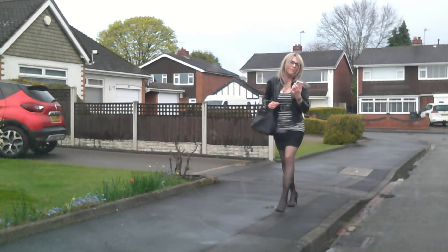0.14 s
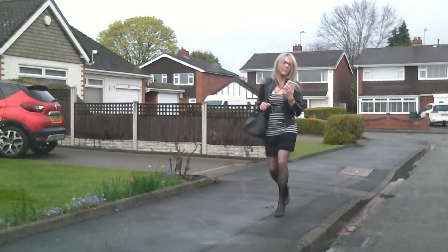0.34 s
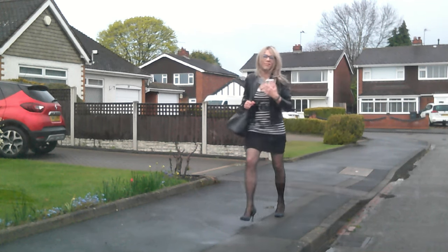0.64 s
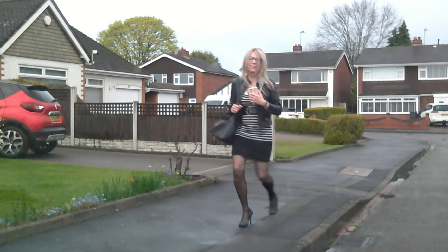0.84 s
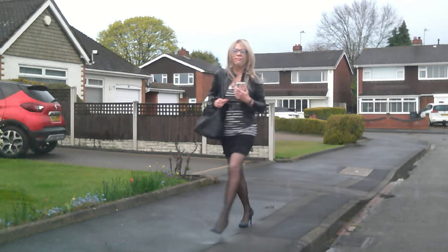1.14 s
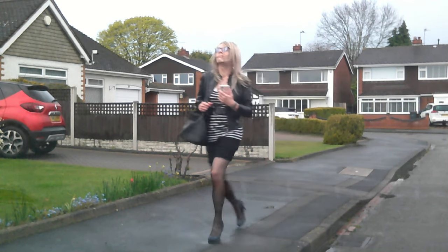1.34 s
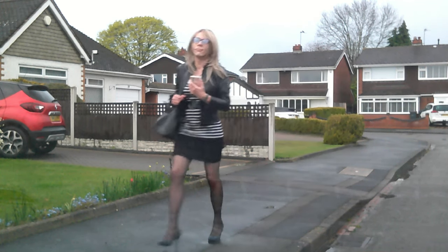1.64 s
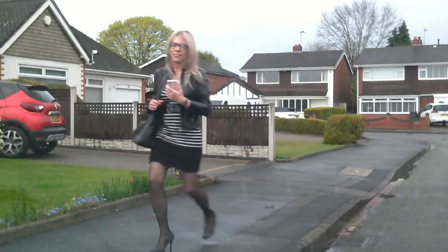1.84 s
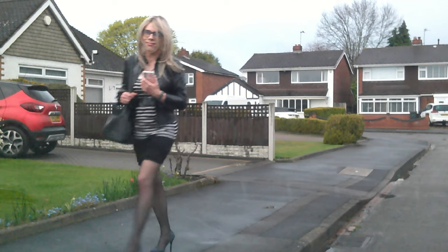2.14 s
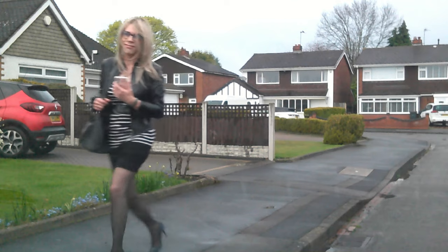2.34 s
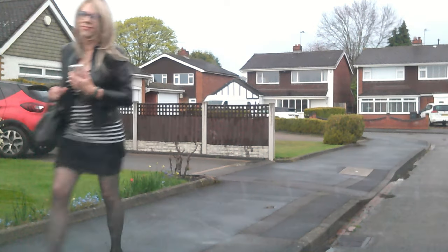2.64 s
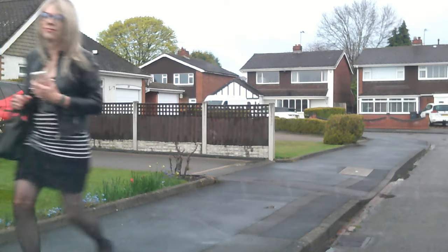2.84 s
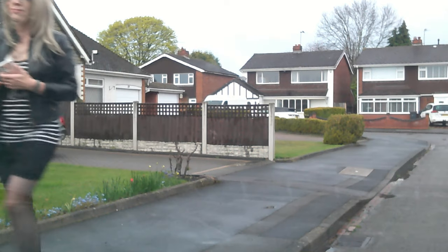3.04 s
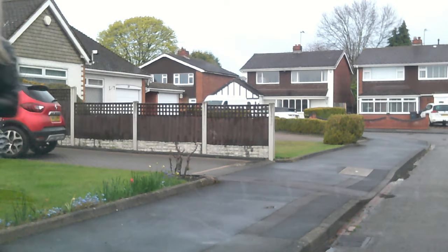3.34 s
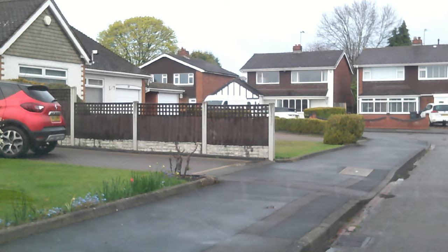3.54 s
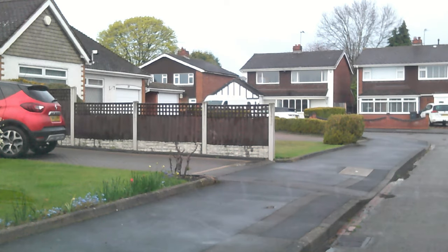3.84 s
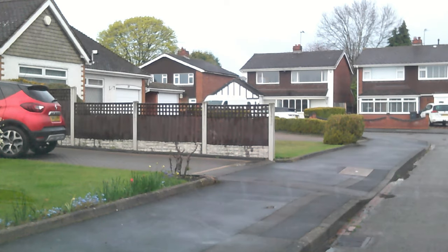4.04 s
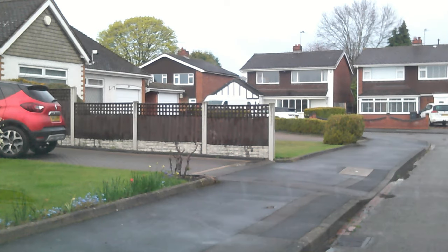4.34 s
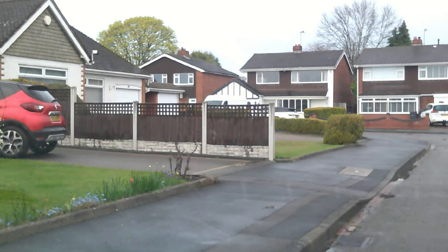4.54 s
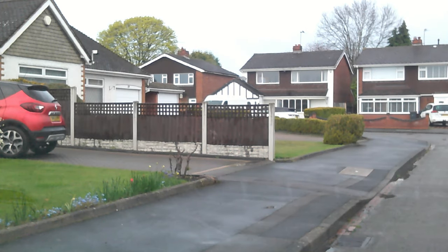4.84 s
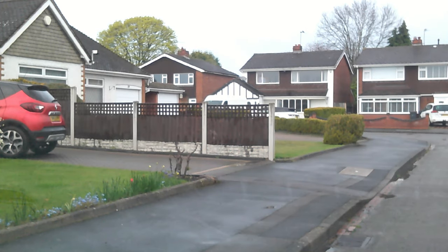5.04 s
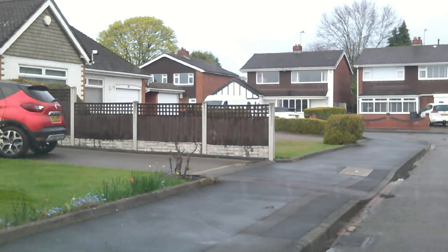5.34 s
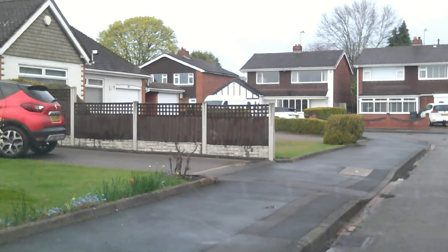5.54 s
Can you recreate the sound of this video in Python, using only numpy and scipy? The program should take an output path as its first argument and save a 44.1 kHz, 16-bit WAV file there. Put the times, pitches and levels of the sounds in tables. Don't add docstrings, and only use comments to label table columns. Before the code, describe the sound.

From inside a parked car on a quiet residential street, a woman's heels knock dully on wet pavement, roughly two steps a second, with small sole scuffs. She passes, and the strongest steps come from behind near the end. Low wind rumbles on the body of the car, distant traffic and a motor hum sit underneath, a bird peeps faintly, and the small camera's microphone adds hiss and regular buzzes.

```python
import sys
import numpy as np
from scipy import signal
from scipy.fft import rfft, irfft
from scipy.io import wavfile
from scipy.ndimage import uniform_filter1d, map_coordinates

SR = 44100
rng = np.random.default_rng(int(sys.argv[2]) if len(sys.argv) > 2 else 0)


def dump_mix(stems):
    frames = np.atleast_2d(stems).T
    limited = np.clip(frames, -1, 1)
    pcm = np.round(limited * 32767).astype(np.int16)
    wavfile.write(sys.argv[1], SR, pcm)


def amplitude_ratio(level_db):
    exponent = np.asarray(level_db, float) / 20
    return 10 ** exponent


N = 250929
T = np.arange(N) / SR

# start_s, level_db, hardness_db, hollowness_db
HEELS = [(.187, -60.5, 0.5, 2), (.673, -61, -1.5, -2), (.978, -62.5, -8, 8), (1.209, -57.5, -2.5, -7),
         (1.688, -53.5, 1, -1), (2.225, -62.5, 7.5, 0), (2.694, -65, 7, -1.5), (3.221, -64, 2.5, 7.5),
         (3.525, -62, -3, 0), (3.684, -50, -2.5, -8), (4.181, -71.5, -0.5, 8.5)]
# start_s, level_db, hardness_db, hollowness_db
SOLES = [(.231, -71, 2.5, 0.5), (.69, -63.5, 2, 2), (.71, -62, 1.5, 4), (.738, -68.5, 0, 1),
         (.834, -76.5, -2.5, 10.5), (.988, -70.5, -7, 9.5), (1.223, -61, -6, -11), (1.707, -58.5, -4, 2.5),
         (1.759, -67.5, -6.5, 5), (1.808, -70, -1, -2), (1.87, -71.5, -5, 0), (2.211, -69.5, -3, -9),
         (2.244, -67.5, 6, 1), (2.279, -73.5, 5, -4), (2.711, -61, 7.5, -13), (2.74, -65, -3.5, 7.5),
         (3.24, -60, -1, 1), (3.718, -67.5, -2.5, 3), (3.754, -63.5, 1, -18), (4.213, -62.5, -3.5, 2)]
# start_s, level_db, hardness_db, hollowness_db
BEHIND = [
    (4.678, -73, 3, 7),
    (4.785, -61.5, -5, -8),
    (4.709, -48.5, 3, -15),
    (4.730, -67, -3, 1),
    (4.699, -43.5, 0, -14.5),
    (5.208, -62, -7, 10),
    (5.216, -46.5, -15, -8),
    (5.231, -47.5, -3.5, -2),
    (5.275, -66, -16, -5),
]
# pitch_hz, t60_s, lag_s
SHELL_AHEAD = [(720.6, 0.018, 0.002), (623, 0.01, 0.0032), (453.5, 0.042, 0.0047), (346, 0.03, .004),
               (200, 0.039, .003)]
SHELL_BEHIND = [(754, 0.01, 0.00082), (567, 0.0069, 0.0011), (437, 0.0055, 0.0016), (288, 0.017, 0.002),
                (207, 0.0069, 0.0032)]
READY_AHEAD = (0.62, -0.36, -1, 2.7, -0.23)
READY_BEHIND = (-1.2, -0.85, 0.77, 2, -3.1)
# start_s, level_db, centre_hz, width_hz
CRACKS = [(0.189, -68, 940, 200), (0.673, -68.5, 990, 300), (1.692, -77, 1000, 400), (2.695, -63, 964, 300),
          (2.744, -70.5, 2640, 1500), (2.23, -72, 970, 300), (3.69, -60, 946, 250),
          (3.718, -73, 2700, 1200), (4.206, -75, 1470, 1600), (4.73, -62.5, 1060, 300),
          (5.213, -63.5, 1020, 500), (5.219, -62, 2110, 604), (5.219, -67, 1660, 500),
          (5.22, -71, 3000, 1410), (5.239, -68, 1300, 700)]

# start_s (of the peak), length_s, level_db
BUFFETS = [(.13, 0.3, -48.5), (.42, .11, -33.5), (.58, 0.31, -46.5), (.99, 0.22, -50), (1.13, 0.091, -47),
           (1.32, 0.046, -50), (1.55, 0.3, -48), (1.83, 0.35, -54), (2.25, 0.15, -45), (2.48, 0.18, -44.5),
           (2.74, 0.38, -45), (3.11, 0.096, -43.5), (3.32, 0.6, -51.5), (3.63, 0.33, -45.5),
           (3.86, .08, -47.5), (4.07, 0.23, -42), (4.22, 0.11, -43.5), (4.39, 0.081, -47.5),
           (4.57, 0.19, -41.5), (4.74, 0.088, -42.5), (4.86, 0.037, -48), (5.04, 0.075, -41.5),
           (5.2, 0.28, -51.5), (5.53, 0.19, -43)]
# start_s (of the peak), length_s, level_db
GUSTS = [(.15, .3, -61), (.36, .2, -55), (.7, 0.26, -56), (.97, 0.3, -50), (1.2, 0.2, -46),
         (1.55, 0.38, -50.5), (1.71, .12, -47.5), (1.92, .2, -50), (2.14, 0.24, -47), (2.4, 0.53, -49),
         (2.82, 0.33, -48), (3.04, .16, -48.5), (3.4, .2, -48.5), (3.63, 0.39, -43.5), (3.94, .18, -50),
         (4.12, 0.13, -44.5), (4.3, 0.43, -47), (4.68, 0.27, -49), (4.94, 0.17, -53.5), (5.33, 0.43, -50.5),
         (5.68, 0.26, -55)]
# start_s (of the peak), length_s, level_db
PUFFS = [(.01, 0.27, -54.5), (.73, 0.24, -54.5), (.95, .2, -60.5), (1.66, .07, -54), (1.79, 0.088, -54),
         (1.97, 0.42, -54.5), (2.3, 0.67, -59), (2.8, 0.25, -57), (3.13, 0.11, -60), (3.23, .06, -60),
         (3.37, 0.23, -54), (3.95, 0.15, -54), (4.32, 0.11, -49.5), (4.49, .16, -57.5), (4.86, .14, -52),
         (5.08, 0.088, -43), (5.23, 0.41, -56), (5.6, 0.1, -47.5)]
LULL_DB = (-60.5, -63.5, -71)

# pitch_hz, level_db
BUZZ_TONES = [(2261, -85), (2760, -87), (3468, -87.5), (3618, -102), (4522, -104), (6770, -98.5),
              (6934, -100.5), (7251, -87.5), (7402, -89.5)]
# pitch_hz, level_db (per Hz)
BUZZ_FIZZ = [(2000, -33), (2800, -5), (4000, -17), (5200, -31.5), (6100, -11.5), (6800, -2), (7100, -4.5),
             (7600, -5), (8000, -18), (8500, -35)]
# tick_number, lag_s, length_s, level_db
ODD_BURSTS = [(0, -0.011, 0.082, -71.5), (1, -.014, .066, -71.5), (4, -0.0082, .044, -70),
              (5, -0.0056, 0.057, -71), (7, 0.018, 0.054, -71), (12, -.013, 0.074, -71),
              (14, -.009, 0.05, -68), (15, 0.018, 0.085, -70), (16, 0.036, 0.065, -72),
              (17, .007, .055, -70), (25, -0.022, 0.078, -72), (19, 0.003, 0.055, -70),
              (26, -0.0086, .04, -74), (27, -.01, 0.028, -74.5)]

# start_s, length_s, start_hz, end_hz, level_db
BIRD = [
    (1.239, 0.021, 2500, 2480, -79),
    (1.389, 0.031, 2100, 2120, -80),
    (1.425, 0.028, 2130, 2200, -85),
    (1.46, 0.043, 2190, 2230, -91),
    (1.798, .046, 2060, 2000, -81),
    (1.832, 0.037, 2040, 1890, -77.5),
    (1.859, .032, 1920, 1850, -77),
    (1.897, 0.03, 1920, 1830, -79),
    (2.072, 0.041, 1990, 2150, -90),
    (2.165, 0.047, 2220, 2220, -81),
]

# pitch_hz, level_db (per Hz)
STREET = [(12, -27.5), (22, 1), (32, -7.5), (48, -2.5), (82, -13), (115, -14), (170, -14.5), (244, -22),
          (305, -21), (492, -30), (730, -32), (1200, -46.5), (1560, -55.5), (2640, -120)]
# start_s, level_db
STREET_DB = [(0.0, -64.5), (1.7, -64), (2.4, -65), (2.8, -63), (4.9, -63), (5.69, -64.5)]
# start_s, level_db
HUM = [(0.0, -53.5), (0.19, -73), (0.85, -69.5), (1.6, -57.5), (2.1, -55.5), (2.9, -62), (3.06, -72.5),
       (3.77, -59.5), (4.02, -64), (4.36, -56.5), (4.82, -61), (5.13, -57), (5.69, -54)]
# pitch_hz, level_db (per Hz)
HISS = [(530, -31), (900, -1), (1010, -1.5), (1800, -5), (2850, -11), (4970, -28.5), (6080, -23.5),
        (6720, -14), (7040, -17), (7500, -15.5), (8000, -30.5), (10400, -56.5), (17600, -120)]

# start_s, level_db (over the usual hiss, below which detail is lost)
DROPOUTS = [(.025, 5), (.261, 3), (.321, 12), (.666, -2), (1.102, 11), (1.367, -2), (2.092, 12), (2.136, 8),
            (2.37, 5.5), (2.415, 4.5), (2.755, 1), (2.823, 2), (2.88, 16), (3.162, 3), (3.29, 2), (3.37, 8),
            (3.542, 11), (3.569, 4), (3.841, 3), (4.165, 1), (4.292, 6), (4.61, 5.5), (4.762, 4), (4.93, 5),
            (5.356, 1), (5.482, 11.5)]
# start_s, level_db
LONG_DROPOUTS = [(1.56, 6), (1.952, 0), (4.209, 3.5), (4.702, 12.5)]


def heels():
    out = np.zeros(N)
    sides = [(sorted(HEELS + SOLES), SHELL_AHEAD, READY_AHEAD, 3.8),
             (BEHIND, SHELL_BEHIND, READY_BEHIND, 11.0)]
    for rows, shell, ready, blow in sides:
        for row in rows:
            sound = strike(mode_levels(row, ready), shell, blow)
            add(out, row[0] - 0.002, amplitude_ratio(3.5) * sound)
    dulling = signal.butter(6, 1150, fs=SR, output="sos")
    return signal.sosfilt(dulling, out) + cracks()


def mode_levels(row, ready):
    _, db, hardness, hollowness = row
    place = np.linspace(1, -1, len(ready))
    return db + hardness * place + hollowness * place ** 2 + np.array(ready)


def strike(levels_db, shell, blow):
    draw = rng.random((9000, 6))
    t = np.arange(len(draw)) / SR
    rattling = t < 0.017
    bounces_per_s = 900
    scatter = 0.5 * amplitude_ratio(-60 * t / 0.5)
    bounces = (draw[:, 0] < bounces_per_s / SR) * (rattling + scatter)
    bounces[0] = blow
    rise = 1 - np.exp(-(t / 0.0022) ** 2)
    out = np.zeros(len(t))
    for k, (db, (hz, t60, lag)) in enumerate(zip(levels_db, shell)):
        slip = np.where(rattling, 0.25, 1) * 2 * np.pi * draw[:, k + 1]
        ring = amplitude_ratio(-60 * t / t60) * rise
        swing = signal.fftconvolve(bounces * np.exp(1j * slip), ring)[:len(t)]
        swing = swing / abs(swing).max()
        add(out, lag, amplitude_ratio(db) * (swing * np.exp(2j * np.pi * hz * t)).real)
    return out


def cracks():
    out = np.zeros(N)
    t = np.arange(2000) / SR
    rise = 1 - np.exp(-(t / 0.0012) ** 2)
    for s, db, hz, width in CRACKS:
        peak = [(hz / 3, -40), (hz - width / 2, -6), (hz, 0),
                (hz + width / 2, -6), (hz * 1.1, -45), (hz * 2.5, -90)]
        add(out, s, amplitude_ratio(db - 60 * t / 0.094) * rise * coloured(peak, len(t)))
    return out


def wind():
    body_db, low_db, upper_db = LULL_DB
    rocking = gusts(BUFFETS, body_db) * cavity(16.5, 2.0, 3.8)
    boom = gusts(GUSTS, low_db) * amplitude_ratio(-4.5 + 1.2 * drift(12.0)) * cavity(60.87, 4.0, 9.0)
    upper = gusts(PUFFS, upper_db) * amplitude_ratio(-8.5 + 0.74 * drift(13.0)) * cavity(136.9, 5.5, 9.8)
    return rocking + boom + upper


def gusts(rows, lull_db):
    s, length, db = np.transpose(rows)[:, :, None]
    away = 2 * (T[::64] - s) / length
    swell = amplitude_ratio(db - 10.5 * away ** 2)
    level = np.sqrt(amplitude_ratio(lull_db) ** 2 + (swell ** 2).sum(axis=0))
    return uniform_filter1d(level.repeat(64)[:N], size=128)


def cavity(hz, wander_hz, per_s):
    turns = np.cumsum(hz + wander_hz * drift(per_s)) / SR
    return np.sqrt(2) * np.sin(2 * np.pi * turns)


def buzz():
    t = np.arange(5000) / SR
    start_s, every_s, burst_s = 0.0927, 0.20002, 0.053
    usual_burst = (0.002, burst_s, -70.5)  # lag_s, length_s, level_db
    tones = np.zeros(len(t))
    for hz, db in BUZZ_TONES:
        tones += amplitude_ratio(db) * np.sqrt(2) * np.sin(2 * np.pi * (hz * t + rng.random()))
    tones *= amplitude_ratio(-4) * burst_gate(t, 0.0077, burst_s)
    tick = amplitude_ratio(-83.5 - 60 * t / 0.022) * np.sin(2 * np.pi * 4550 * t)
    throb = amplitude_ratio(4.6 * np.cos(2 * np.pi * 155 * (t - 0.004)))
    same = coloured(BUZZ_FIZZ, len(t))
    odd = {round(row[0]): row[1:] for row in ODD_BURSTS}
    out = np.zeros(N)
    for k, s in enumerate(np.arange(start_s, N / SR, every_s)):
        add(out, s, tick + tones)
        lag, length, db = odd.get(k, usual_burst)
        fizz = 0.96 * same + 0.7 * coloured(BUZZ_FIZZ, len(t))
        add(out, s + lag, burst_gate(t, 0.0014, length) * amplitude_ratio(db - 13.5) * throb * fizz)
    return out


def burst_gate(t, rise_s, length_s):
    return np.clip(t / rise_s, 0, 1) * np.clip((length_s - t) / 0.0021, 0, 1)


def bird():
    out, flutter = np.zeros(N), drift(45.0)
    for s, length, start_hz, end_hz, db in BIRD:
        hz = np.linspace(start_hz, end_hz, round(length * SR))
        hz += 230 * np.sin(np.linspace(0, np.pi, len(hz)))
        rough = flutter[round(s * SR):][:len(hz)]
        level = amplitude_ratio(db + 5.5 + 2.0 * rough) * np.hanning(len(hz))
        add(out, s, level * np.sin(2 * np.pi * np.cumsum(hz) / SR))
    return out


def street():
    wash = coloured(STREET, N)
    audible = signal.butter(4, [160, 1000], "band", fs=SR, output="sos")
    wash = wash / signal.sosfilt(audible, wash).std()
    return wash * amplitude_ratio(curve(STREET_DB) + 0.66 * drift(2.7))


def motor_hum():
    return amplitude_ratio(curve(HUM) - 2.5 + 0.46 * drift(1.0)) * cavity(102.4, 0.87, 2.5)


def hiss():
    return amplitude_ratio(-76 + 0.59 * drift(8.0)) * coloured(HISS, N)


def treble_dropouts(x):
    hz, t, z = signal.stft(x, SR, nperseg=512, noverlap=448)
    usual = np.median(abs(z[(hz > 4000) & (hz < 6000)]))
    moments = [(s, db, 0.021) for s, db in DROPOUTS]
    moments += [(s, db, 0.038) for s, db in LONG_DROPOUTS]
    for s, db, length in moments:
        frame = (t > s) & (t < s + length)
        level = np.sqrt((abs(z[:, frame]) ** 2).mean(axis=1))
        margin_db = 20 * np.log10(level / usual) - db - 4.0
        kept = np.where(hz > 1200, 1.26 / (1 + amplitude_ratio(-4.5 * margin_db)), 1)
        z[:, frame] *= kept[:, None]
    return signal.istft(z, SR, nperseg=512, noverlap=448)[1][:N]


def evened(x):
    return x / np.sqrt(np.mean(x ** 2) + 1e-20)


def coloured(spectrum, size):
    hz = np.fft.rfftfreq(size, 1 / SR)
    f, db = np.transpose(spectrum)
    shape = amplitude_ratio(np.interp(np.log(hz + 1), np.log(f + 1), db))
    return evened(irfft(rfft(rng.standard_normal(size)) * shape, size))


def drift(per_s):
    knots = rng.standard_normal(600)
    return evened(map_coordinates(knots, [2 * per_s * T + 5], order=3))


def curve(rows):
    s, db = np.transpose(rows)
    return np.interp(T, s, db)


def add(mix, s, sound):
    part = mix[round(s * SR):][:len(sound)]
    part += sound[:len(part)]


def scene():
    return (heels() + wind() + buzz() + bird() + street() + motor_hum() + hiss())[None]


def roll_off(x):
    return signal.sosfilt(signal.butter(12, 15750, fs=SR, output="sos"), x)


def record(dry):
    grain = amplitude_ratio(-99) * rng.standard_normal(N)
    fade = np.clip((T[-1] - T) / 0.008, 0, 1)
    mix = (treble_dropouts(dry[0]) + grain) * fade
    return roll_off(mix[None])


dry = scene()
out = record(dry)
dump_mix(out)
```